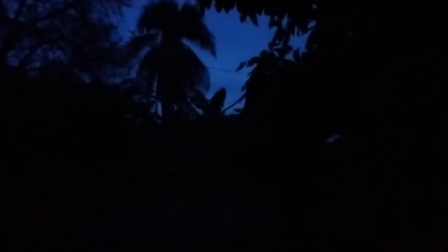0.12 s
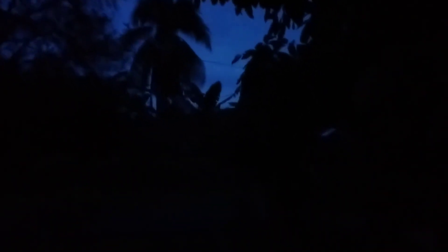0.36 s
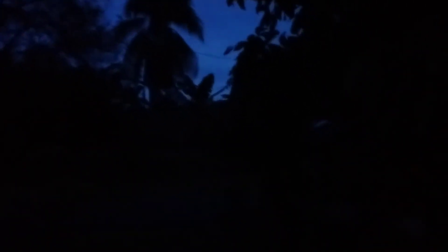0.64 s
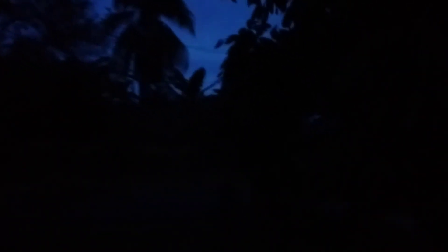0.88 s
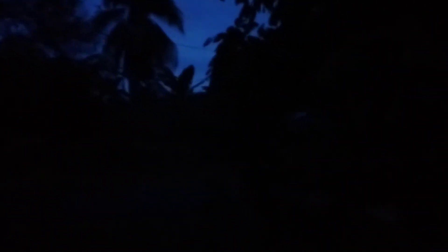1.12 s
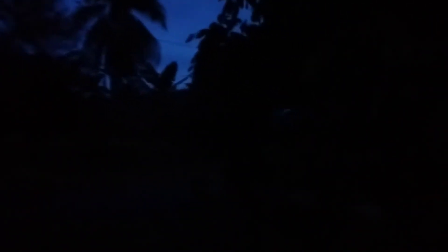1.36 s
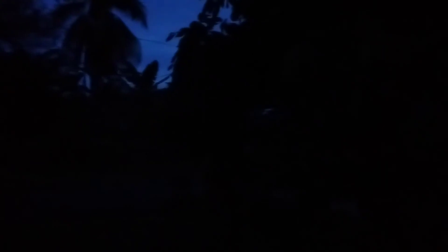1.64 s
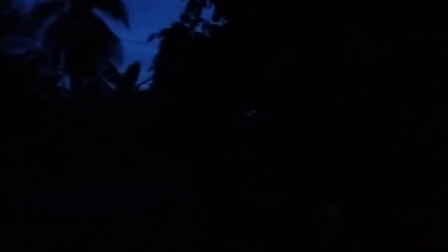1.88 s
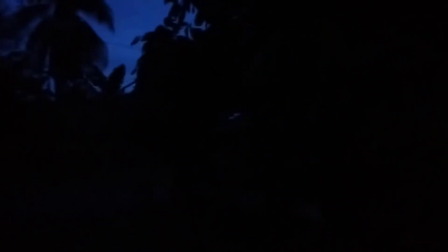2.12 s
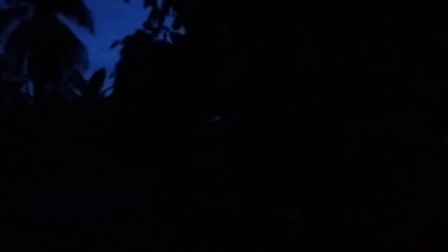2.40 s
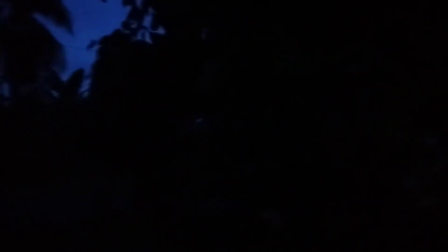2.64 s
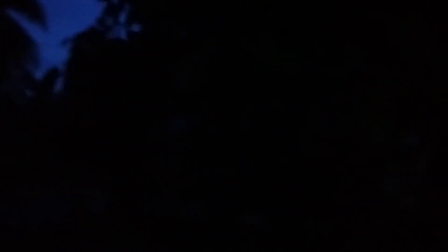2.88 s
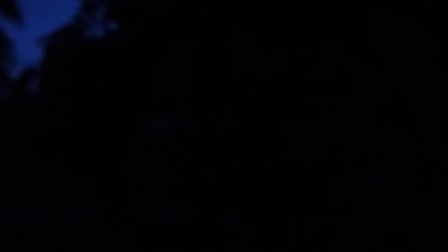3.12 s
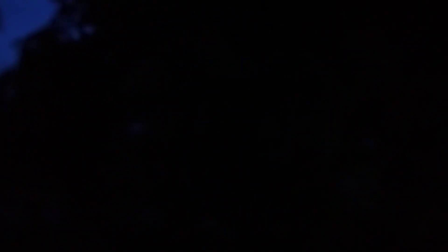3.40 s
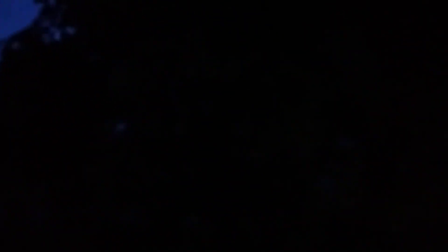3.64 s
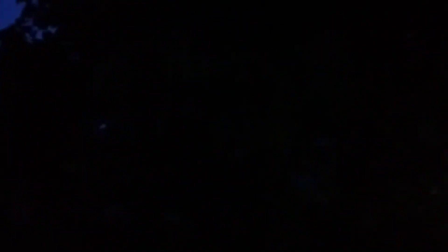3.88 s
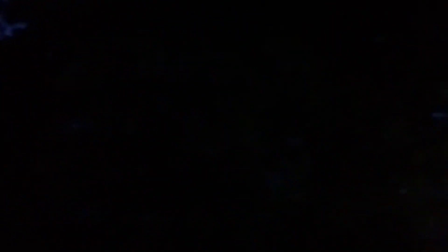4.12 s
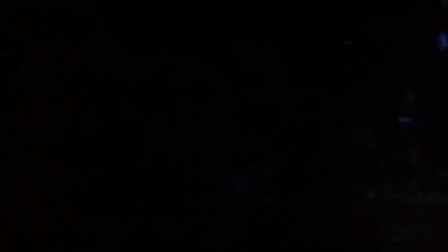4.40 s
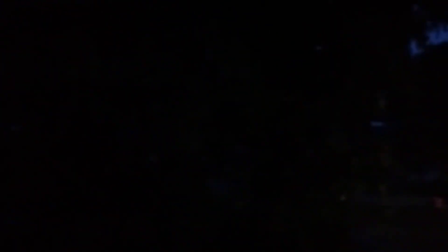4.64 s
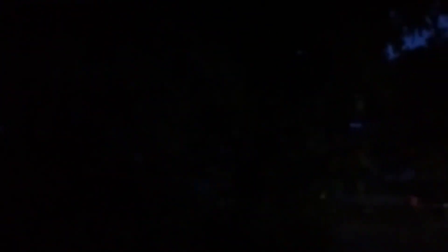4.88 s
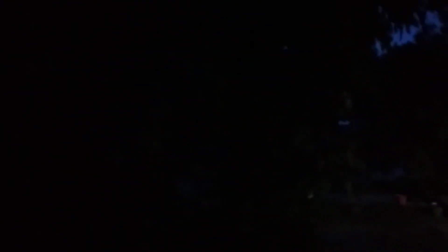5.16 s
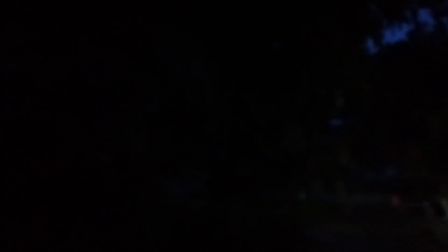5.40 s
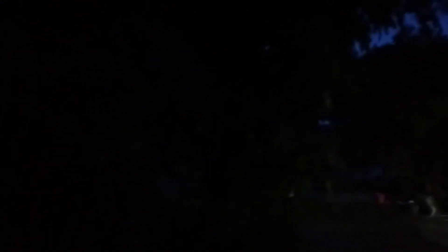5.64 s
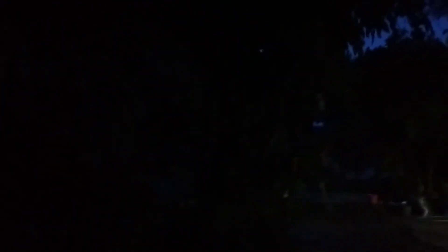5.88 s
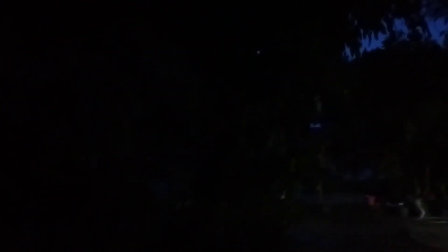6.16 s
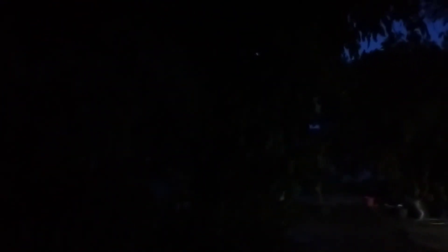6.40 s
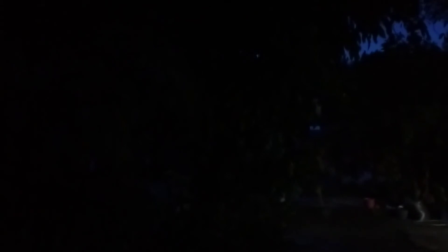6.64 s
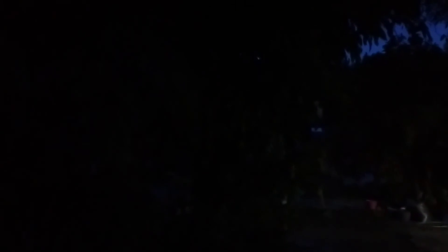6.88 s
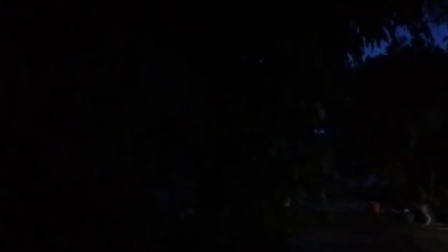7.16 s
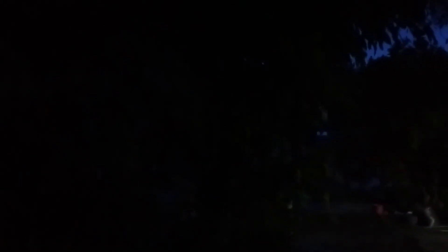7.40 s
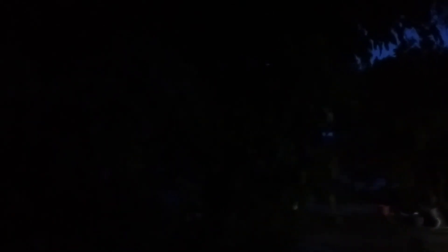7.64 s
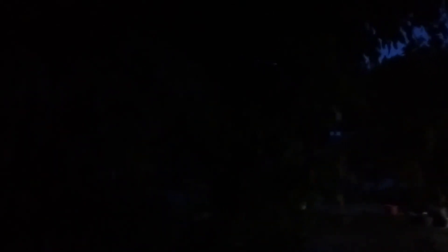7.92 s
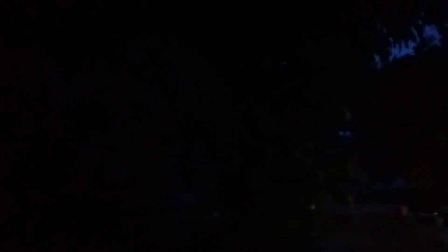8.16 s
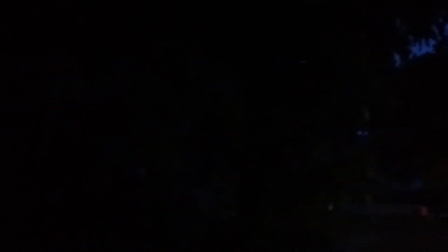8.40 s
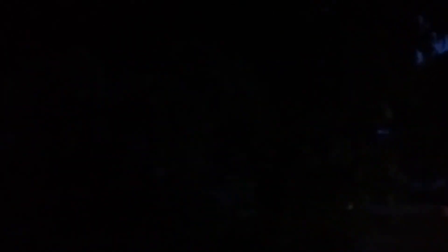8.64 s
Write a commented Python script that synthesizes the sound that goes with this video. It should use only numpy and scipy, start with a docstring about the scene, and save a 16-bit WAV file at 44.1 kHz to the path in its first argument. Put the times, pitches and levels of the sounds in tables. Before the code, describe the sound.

Outdoor dawn chorus among palms and dense foliage. Clear, rapid whistles swoop up and down, echoing off trunks, with short burry warbles and one nearer, drier bird. Soft hoarse low calls sit almost hidden. Behind them are continuous overlapping distant peeps, gradually swelling, steady insect buzzing and faint hum. The singing opens briskly, thins out, then returns richly until the end, with occasional gritty scuffs and two tiny ticks.

```python
"""From the first moment a distant motor hums in still dawn air, insects buzz high up and a far flock
peeps without pause; then songbirds whistle gliding notes that echo off trunks and walls.
Birds are gliding tones split into direct sound and echoes; the insects are throbbing bands of noise.
Soft hoarse calls lie low in the mix; gritty noise makes raspy scuffs, decaying sines make thin ticks."""
import sys
import numpy as np
from scipy import signal
from scipy.fft import rfft, irfft, next_fast_len
from scipy.io import wavfile
from scipy.ndimage import uniform_filter1d

SR = 44100
rng = np.random.default_rng(int(sys.argv[2]) if len(sys.argv) > 2 else 0)


def to_wav(sig):
    """Store sig (one row per channel, or 1-D mono) as 16-bit WAV at the path in sys.argv[1].

    Samples outside -1..1 are clipped; the rate is SR.
    """
    pcm = np.clip(np.atleast_2d(sig), -1, 1) * 32767
    pcm = np.round(pcm).astype(np.int16)
    wavfile.write(sys.argv[1], SR, pcm.T)  # frames by channels


def invert_db(x):
    """Field ratio 10**(x/20) for x, a level in decibels (scalar or array-like)."""
    u = np.asarray(x, float) / 20
    return 10 ** u


N = 387198

# still air and far traffic, relative spectrum: (f/Hz, level/dB per Hz)
AIR_SPECTRUM = [(50, -60), (62, -8), (140, -2), (320, -6), (500, -12), (1080, -12.5), (1300, -4),
                (2400, -18), (3100, -13), (3850, -20), (6500, -22.5), (11000, -25), (12200, -38),
                (15600, -24)]
# partials of the motor hum: (f/Hz, mean level/dB)
MOTOR_PARTIALS = [(92, -67), (190, -71)]
# insect bands: (centre f/Hz, half-width f/Hz, mean level/dB, mean wing strokes/per s, stroke depth/0-1)
INSECT_BANDS = [(5005, 350, -64.5, 440, 0.27), (7470, 200, -71, 130, 0.3), (9960, 664, -64.5, 150, 0.14)]
# loudest peeps of the far flock, before the flock's own trims: (t/s, mid f/Hz, level/dB, length t/s)
LOUD_PEEPS = [(0.434, 1795, -59, 0.067), (0.575, 1890, -54, 0.038), (0.928, 2060, -46.5, 0.025),
              (2.421, 1953, -56, 0.062), (2.51, 2230, -54.5, 0.12), (2.639, 1732, -56, 0.071),
              (2.768, 2300, -59, 0.049), (2.85, 1860, -55, 0.027), (2.951, 1686, -56, 0.041),
              (3.022, 1934, -51, 0.041), (3.147, 2060, -44.5, 0.031), (3.19, 2304, -49, 0.021),
              (3.234, 2037, -47, 0.052), (3.518, 1960, -53, 0.062), (3.591, 2114, -53, 0.082),
              (3.739, 1740, -55, 0.069), (3.937, 1965, -53.5, 0.034), (4.037, 1720, -49.5, 0.047),
              (4.283, 2060, -50, 0.075), (4.48, 2280, -51, 0.049), (4.507, 1595, -50.5, 0.017),
              (4.622, 2424, -47, 0.021), (4.922, 2075, -46.5, 0.11), (5.222, 1990, -44, 0.081),
              (5.376, 2264, -48.5, 0.077), (5.595, 1550, -54, 0.054), (5.804, 1846, -54, 0.076),
              (5.862, 1630, -52.5, 0.033), (6.235, 1953, -47.5, 0.043), (6.243, 1667, -54.5, 0.071),
              (6.368, 2316, -44, 0.15), (6.683, 1924, -50.5, 0.036), (6.956, 1883, -49.5, 0.074),
              (7.173, 1610, -49, 0.035), (7.539, 2410, -54, 0.081), (7.823, 1840, -53, 0.075),
              (8.076, 1628, -51.5, 0.026), (8.114, 2290, -47.5, 0.056), (8.201, 2223, -42.5, 0.022),
              (8.334, 1680, -51.5, 0.014), (8.748, 1820, -52, 0.025)]
# crowd of the far flock, reference level of a peep at each pitch: (f/Hz, level/dB)
CROWD_LEVELS = [(1200, -65), (1300, -64), (1600, -57.5), (2000, -51), (2400, -55), (2600, -68.5)]
# whistles across the garden, level at the source: (start t/s, length t/s, from f/Hz, to f/Hz, level/dB)
GARDEN_NOTES = [(.1, 0.058, 2664, 2930, -39.5), (.146, .058, 2910, 3080, -34.5),
                (.2, 0.039, 3100, 3380, -35), (.234, 0.023, 3345, 3375, -27.5),
                (.26, 0.012, 3506, 2860, -35), (.31, 0.062, 3820, 3750, -50),
                (.395, 0.02, 3900, 4115, -36.5), (.414, 0.025, 4060, 3320, -33.5),
                (.445, 0.043, 3300, 3270, -34), (.535, 0.056, 3328, 3303, -30),
                (.592, 0.021, 3367, 2970, -32.5), (.7, 0.064, 2610, 2900, -38),
                (.752, 0.029, 2915, 2970, -35), (.783, 0.037, 2950, 2835, -42.5),
                (.8, 0.043, 2480, 2210, -45.5), (.845, 0.062, 2440, 2600, -42.5),
                (.925, 0.04, 2480, 2060, -49), (.966, 0.014, 3240, 4370, -44),
                (.985, 0.026, 2850, 3460, -35), (1.012, 0.033, 3295, 3510, -29),
                (1.05, 0.09, 3590, 4360, -33.5), (1.13, 0.038, 4310, 4890, -37),
                (1.025, 0.086, 2815, 2496, -44.5), (1.29, 0.057, 4230, 2880, -36.5),
                (1.37, 0.089, 2483, 2565, -45.5), (1.445, 0.095, 2532, 2392, -38),
                (1.58, 0.14, 2400, 2365, -43), (1.805, 0.023, 2890, 2600, -43.5),
                (1.47, 0.036, 3080, 3054, -51.5), (1.74, 0.12, 2404, 2296, -43),
                (1.87, 0.09, 2290, 2186, -44), (1.9, 0.16, 2503, 2260, -43), (1.88, 0.045, 2690, 3050, -41),
                (1.92, 0.14, 2970, 3290, -40), (2.065, 0.056, 2990, 3013, -32.5),
                (2.128, 0.03, 3020, 3680, -32), (2.158, 0.05, 3710, 2804, -34),
                (2.19, 0.041, 2350, 2270, -44.5), (2.38, 0.016, 3410, 2760, -48),
                (2.425, 0.04, 2550, 2780, -47.5), (2.46, 0.048, 2876, 2850, -42.5),
                (2.93, 0.039, 3840, 3130, -60.5), (3.092, 0.021, 3000, 3420, -47),
                (3.115, 0.094, 3454, 3700, -47), (3.7, 0.12, 2430, 2396, -54),
                (3.2, 0.083, 3695, 3806, -45), (3.405, 0.016, 4000, 4010, -45.5),
                (3.418, 0.029, 3950, 2800, -43.5), (3.445, 0.02, 2740, 2630, -51),
                (3.465, .045, 2356, 2280, -54), (3.865, 0.035, 3270, 3330, -58),
                (3.897, 0.047, 3750, 2630, -53), (3.79, 0.051, 2433, 2323, -45),
                (3.97, .055, 2430, 2424, -52.5), (4.03, 0.032, 2394, 2330, -43),
                (4.07, 0.027, 2310, 2210, -58), (4.315, 0.039, 2310, 2230, -45),
                (4.115, 0.018, 2500, 3900, -49.5), (4.243, 0.021, 3820, 2630, -51.5),
                (4.245, 0.066, 2329, 2327, -40), (5.08, 0.3, 2990, 3420, -63.5),
                (5.645, 0.097, 3126, 2506, -41.5), (5.71, 0.11, 2590, 2530, -39.5),
                (5.8, 0.084, 2585, 2930, -43), (5.87, .12, 2550, 2300, -48),
                (6.075, 0.18, 2676, 3234, -39.5), (6.17, 0.11, 3225, 3415, -34.5),
                (6.132, 0.027, 3680, 4140, -42.5), (6.155, 0.088, 4160, 4330, -38),
                (6.22, 0.1, 4335, 4217, -38), (6.418, 0.018, 3380, 3620, -40),
                (6.438, 0.043, 3570, 2926, -30.5), (6.488, 0.028, 3000, 3506, -31),
                (6.515, 0.061, 3310, 3590, -33), (6.385, 0.053, 2570, 2720, -48),
                (6.425, 0.092, 2694, 2230, -37), (6.54, 0.032, 2250, 2280, -39),
                (6.59, 0.078, 2300, 2920, -36), (6.697, 0.021, 2814, 2960, -34),
                (6.73, 0.05, 2940, 3280, -30), (6.77, 0.067, 3310, 3177, -29.5),
                (6.845, 0.037, 3150, 2910, -35.5), (6.75, 0.056, 2770, 2390, -37),
                (6.87, 0.089, 2090, 2213, -43), (6.9, 0.026, 4450, 4780, -48),
                (6.918, 0.04, 4820, 3840, -39), (6.95, 0.036, 3900, 4050, -33),
                (7.0, 0.026, 4080, 3550, -38), (7.02, 0.027, 3490, 3300, -31.5),
                (6.945, 0.061, 5120, 5150, -36), (6.98, 0.049, 5220, 5950, -36),
                (7.01, 0.036, 6040, 6140, -35.5), (7.04, 0.039, 6000, 6540, -39.5),
                (7.0, 0.044, 2583, 2364, -38), (7.07, 0.11, 2666, 3220, -37),
                (7.15, 0.089, 3206, 3640, -30.5), (7.26, 0.1, 3590, 3266, -31.5),
                (7.142, 0.074, 4500, 5150, -40.5), (7.185, 0.12, 5104, 5214, -35),
                (7.2, 0.039, 2430, 2960, -40.5), (7.24, 0.19, 2900, 3330, -44),
                (7.388, 0.033, 5050, 4990, -34.5), (7.425, 0.05, 4940, 4030, -39),
                (7.465, 0.051, 3940, 2800, -31), (7.52, 0.059, 2760, 2140, -39),
                (7.55, 0.038, 2150, 2044, -42), (7.4, 0.044, 5690, 5700, -52),
                (7.468, 0.066, 3716, 3480, -36), (7.52, 0.058, 3500, 3640, -50),
                (7.598, 0.033, 3350, 3430, -37), (7.628, 0.031, 3540, 3520, -34.5),
                (7.646, 0.014, 3410, 2950, -37.5), (7.665, 0.021, 2078, 2013, -38.5),
                (7.695, 0.087, 2143, 2094, -44.5), (7.73, 0.062, 3400, 3300, -43),
                (7.77, 0.03, 3385, 2930, -30.5), (7.81, 0.032, 3046, 2960, -34),
                (7.785, 0.05, 2900, 2470, -42.5), (7.825, 0.06, 2440, 2300, -48),
                (7.885, 0.055, 2440, 2330, -36), (7.875, 0.087, 2590, 2720, -36.5),
                (7.94, 0.05, 2240, 2300, -53), (8.0, 0.09, 2320, 2480, -43.5),
                (7.76, 0.093, 4830, 5100, -51.5), (8.13, 0.095, 3003, 2484, -37),
                (8.188, 0.042, 2800, 2945, -36), (8.27, 0.11, 2717, 2700, -38.5),
                (8.36, .12, 2800, 2730, -47), (8.305, .03, 2035, 2370, -46), (8.33, 0.08, 2390, 2320, -44),
                (8.51, 0.048, 3230, 3640, -45), (8.55, 0.14, 3605, 3840, -47.5),
                (8.68, 0.076, 3760, 3720, -56), (8.527, 0.068, 3080, 2650, -37.5),
                (8.59, 0.033, 2560, 2060, -41.5), (8.48, 0.043, 2120, 2040, -45),
                (8.55, 0.064, 2320, 2390, -45), (8.705, 0.044, 2350, 2820, -40),
                (8.68, 0.058, 2125, 2136, -45)]
# whistles of the bird nearest the microphone: (start t/s, length t/s, from f/Hz, to f/Hz, level/dB)
NEAR_BIRD_NOTES = [(2.085, 0.15, 3830, 3950, -41), (2.215, 0.091, 4010, 4080, -44),
                   (3.16, 0.14, 3750, 4434, -43.5), (3.285, 0.03, 4400, 4960, -45.5),
                   (3.31, 0.031, 4890, 5870, -50.5), (3.33, 0.035, 5870, 5750, -48.5),
                   (5.13, 0.12, 4260, 4107, -36.5), (5.233, 0.017, 4240, 5520, -43.5),
                   (5.245, 0.039, 5400, 5520, -44.5), (5.275, 0.061, 5570, 6470, -44),
                   (5.333, 0.033, 6530, 6455, -42.5), (6.31, 0.075, 3970, 4090, -40),
                   (6.378, 0.034, 4040, 4310, -39), (6.403, 0.017, 4350, 5400, -37.5),
                   (6.42, 0.04, 5340, 6240, -41.5), (8.11, 0.045, 3015, 3050, -42),
                   (8.14, 0.069, 3030, 3560, -37), (8.21, 0.094, 3573, 3600, -37.5),
                   (8.29, 0.078, 3650, 3890, -40)]
# notes sung as a burry warble: (start t/s, length t/s, from f/Hz, to f/Hz, level/dB)
WARBLED_NOTES = [(2.567, 0.039, 3165, 3060, -43), (3.525, 0.032, 2980, 3230, -46.5),
                 (3.555, 0.043, 3210, 3040, -47), (5.82, 0.06, 3755, 4043, -39.5),
                 (5.875, 0.041, 3990, 3400, -34.5), (5.91, 0.093, 3280, 3505, -39.5),
                 (7.81, 0.076, 3045, 2970, -40), (7.9, 0.084, 2680, 2740, -43),
                 (7.99, 0.078, 2890, 2770, -42)]
# low soft calls: (start t/s, length t/s, from f/Hz, to f/Hz, level/dB)
SOFT_CALLS = [(0.283, .16, 664, 643, -64.5), (0.658, .12, 707, 627, -64.5), (.84, 0.23, 681, 688, -65.5),
              (1.09, 0.073, 729, 723, -57.5), (1.13, 0.34, 808, 839, -61.5), (1.778, 0.107, 791, 784, -62),
              (1.881, .14, 879, 857, -63.5), (2.02, .05, 860, 790, -61), (6.34, 0.085, 620, 683, -63),
              (7.78, .12, 600, 720, -65), (8.745, 0.032, 670, 800, -51)]
# octave against its note, by where the octave lands: (f/Hz, relative level/dB)
OCTAVE_STRENGTH = [(5000, -10), (6600, -31), (7600, -23), (8200, -7.5), (9000, -19), (10500, -12),
                   (13000, -23)]
# higher overtones against their note, by where they land: (f/Hz, relative level/dB)
OVERTONE_STRENGTH = [(9000, -48), (11500, -44), (12600, -35), (13600, -39), (15200, -26)]
# raspy scuffs, level before darkening: (t/s, level/dB, rise t/s, t60/s, tilt/dB per octave)
SCUFF_EVENTS = [(0.647, -43, 0.0031, 0.86, 2.5), (1.173, -37.5, 0.023, 0.93, 6),
                (1.537, -49, 0.0081, 0.8, 4.5), (1.651, -49, 0.14, 0.3, -2), (4.656, -36, 0.015, 0.47, 4.5),
                (4.699, -42, 0.15, 0.32, -3), (4.84, -46, 0.06, 0.3, -5)]
# shared spectrum of the scuffs before their tilt: (f/Hz, relative level/dB per Hz)
SCUFF_SPECTRUM = [(1200, -35), (2800, 3.5), (4000, 2), (5400, 2.5), (6700, -10), (8300, -3), (9500, -14.5),
                  (12300, -25), (14800, -18)]
# thin treble ticks: (t/s, reference level/dB)
TICK_EVENTS = [(5.015, -45), (5.912, -33)]

AIR_DB = -56.5
CROWD_PEEPS_PER_S = 110
EDGE_HZ = 15550  # top of the band
GARDEN_DISTANCE, NEAR_DISTANCE = 0.35, 0.019  # 0 at the microphone, 1 far off
FARTHER_PER_DB, LOUD_DB = 0.025, -36  # a fainter garden note comes from a farther bird
ATTACK_S, RELEASE_S = 0.012, 0.0048  # fades centred on a note's start and end
ARCH_DB, PEAK_AT = -3, 0.55  # ends of a note against its peak, and the peak's share of its length
EASE = 0.35  # 0 glides evenly, 1 lingers on the first and last pitch
WARBLES_PER_S, SWING_HZ = 90, 190  # mean rate of a warble and its pitch swing each way
# overtones against the table: third of the near bird, third of the others, fifth, even ones above the octave
NEAR_THIRD_DB, THIRD_DB, FIFTH_DB, EVEN_DB = 1, 9, 2, -8
HOARSE = 0.6  # share of a low call's power that is rasp
ECHO_DB, BOUGHS_T60_S = -0.63, 0.1
CLOSE_ECHO_DB = -2  # a bird at the microphone stirs this much less echo
DARKEN_DB_PER_S = 16  # extra loss of a scuff for each octave above 3 kHz


def evened(x):
    """Scales to an rms of 1."""
    return x / np.sqrt(np.mean(x ** 2) + 1e-20)


def read(points, hz):
    """Reads a spectrum on a log-frequency axis."""
    f, value = np.transpose(points)
    return np.interp(np.log(hz + 1), np.log(f + 1), value)


def add(mix, s, sound):
    """Mixes a sound in at second s."""
    part = mix[max(round(s * SR), 0):][:len(sound)]
    part += sound[:len(part)]


def drift(samples, length=N):
    """Slow random wander of rms 1: noise smoothed twice over a span of samples."""
    span = max(round(samples), 2)
    noise = rng.standard_normal(length)
    return evened(uniform_filter1d(uniform_filter1d(noise, span), span))


def colour(x, db_of_hz):
    """Filters x by a gain in dB for each frequency."""
    size = next_fast_len(len(x))
    gain = invert_db(db_of_hz(np.fft.rfftfreq(size, 1 / SR)))
    return irfft(rfft(x, size) * gain, size)[:len(x)]


def still_air():
    """Smooth broadband noise shaped to the spectrum of still air and far traffic."""
    noise = rng.standard_normal(N)
    return invert_db(AIR_DB) * evened(colour(noise, lambda hz: read(AIR_SPECTRUM, hz)))


def motor_hum():
    """Sine partials that share one wavering speed while each wanders in level."""
    turns = np.cumsum(1 + 0.012 * drift(4750)) / SR
    hum = np.zeros(N)
    for hz, db in MOTOR_PARTIALS:
        level = invert_db(db + 2.5 * drift(2600))
        hum += np.sqrt(2) * level * np.sin(2 * np.pi * hz * turns)
    return hum


def insects():
    """Each kind is a band of noise that throbs at its wing rate and swells slowly."""
    out = np.zeros(N)
    for centre_hz, width, db, rate, depth in INSECT_BANDS:
        noise = rng.standard_normal(N)
        band = evened(colour(noise, lambda hz: np.maximum(-4.3 * ((hz - centre_hz) / width) ** 2, -90)))
        wing_phase = 2 * np.pi * np.cumsum(rate * (1 + 0.0184 * drift(8000))) / SR
        strokes = 1 + depth * np.sin(wing_phase)
        out += invert_db(db + 0.8 * drift(12000)) * strokes * band
    return out


def peep(s, hz, db, length, glide, rate, start):
    """A short call that jumps in, bends and wobbles in pitch and throbs in quick pulses."""
    u = np.arange(0, 1, 1 / (SR * length))  # share of the peep gone by
    wobble = 0.031 * np.sin(2 * np.pi * (rate * length * u + 3 * start))
    pitch = hz * (1 + glide * (u - 0.4) + wobble)
    throb = 1 + 0.69 * np.sin(2 * np.pi * (rate * length * u + start))
    swell = np.sin(np.pi * u ** 0.6) ** 0.94
    tone = np.sin(2 * np.pi * np.cumsum(pitch) / SR)
    return s, np.sqrt(2) * invert_db(db) * swell * throb * tone


def flock():
    """The loud peeps sag at their set moments; the crowd behind them peeps at random."""
    out = np.zeros(N)
    chances = rng.random((len(LOUD_PEEPS), 3))
    for (s, hz, db, length), (bend, rate, start) in zip(LOUD_PEEPS, chances):
        add(out, *peep(s - 0.004, hz, db + 0.5, length + 0.024, -0.07 * bend, 75 + 45 * rate, start))
    low_hz, high_hz = CROWD_LEVELS[0][0], CROWD_LEVELS[-1][0]
    crowd = rng.random((round(CROWD_PEEPS_PER_S * N / SR), 7))
    for when, where, size, span, bend, rate, start in crowd:
        hz = low_hz * (high_hz / low_hz) ** where
        db = read(CROWD_LEVELS, hz) + 13 * (size - 1.1) + 4 * when  # the crowd swells as time goes on
        length = 0.025 + 0.04 * span
        add(out, *peep(when * N / SR, hz, db, length, 0.12 * (bend - 0.6), 60 + 55 * rate, start))
    return out


def trees(x, t60, late_db):
    """Quick dense echoes off near boughs plus a long tail; three sets of leaves take turns in the sway."""
    at = np.arange(100, SR - 20, 20)
    sway = 2 * np.pi * np.cumsum(11 + 5 * drift(2501)) / SR
    decay = invert_db(-60 * at / SR / BOUGHS_T60_S) + invert_db(late_db - 60 * at / SR / t60)
    out = np.zeros(N)
    for k in range(3):
        tail = np.zeros(SR)
        tail[at + rng.integers(0, 20, len(at))] = rng.choice([-1., 1.], len(at)) * decay
        turn_taking = np.cos(sway + k * 2 * np.pi / 3)
        out += signal.oaconvolve(x * turn_taking, tail / np.linalg.norm(tail))[:N]
    return out * np.sqrt(2 / 3)


def whistle(start, length, from_hz, to_hz, db, dull_db, third_db=THIRD_DB, burr=0):
    """A gliding near-sine: its level and phase flutter at random, effort lifts overtones above the octave."""
    t = np.arange(-ATTACK_S / 2, length + RELEASE_S / 2, 1 / SR)
    u = np.clip(t / length, 0, 1)  # share of the note gone by
    glide = u - EASE * np.sin(2 * np.pi * u) / (2 * np.pi)
    off_peak = np.where(u < PEAK_AT, 1 - u / PEAK_AT, (u - PEAK_AT) / (1 - PEAK_AT))
    level_db = db + ARCH_DB * off_peak ** 2
    flutter = 1 + 0.23 * (drift(350, len(t)) + 1j * drift(350, len(t)))
    warble_hz = WARBLES_PER_S * (1 + 0.329 * drift(300, len(t)))
    beat = burr * np.sin(2 * np.pi * np.cumsum(warble_hz) / SR)
    pitch = from_hz + (to_hz - from_hz) * glide
    pitch = pitch * (1 + 0.0056 * drift(88, len(t))) + SWING_HZ * beat
    turn = np.exp(2j * np.pi * np.cumsum(pitch) / SR)
    tone = turn.copy()
    for k in range(2, 7):
        if k == 2:
            strength_db = read(OCTAVE_STRENGTH, k * pitch) + dull_db
        else:
            effort_db = 0.6 * (level_db - LOUD_DB)
            trim_db = {3: third_db, 5: FIFTH_DB}.get(k, EVEN_DB)
            strength_db = read(OVERTONE_STRENGTH, k * pitch) + effort_db + trim_db
        tone += invert_db(strength_db) * (k * pitch < EDGE_HZ) * turn ** k
    ends = np.clip(np.minimum((t - t[0]) / ATTACK_S, (t[-1] - t) / RELEASE_S), 0, 1)
    voice = (flutter * (1 + 0.13 * beat) * tone).real
    return start + t[0], np.sqrt(2) * invert_db(level_db) * ends * voice


def songbirds():
    """Splits notes into direct sound and echo feed; distance takes away direct sound and dulls the octave."""
    direct, echoed = np.zeros((2, N))
    groups = [(GARDEN_NOTES, GARDEN_DISTANCE, THIRD_DB, 0),
              (NEAR_BIRD_NOTES, NEAR_DISTANCE, NEAR_THIRD_DB, 0),
              (WARBLED_NOTES, GARDEN_DISTANCE, THIRD_DB, 1)]
    for rows, perch, third_db, burr in groups:
        for row in rows:
            farther = FARTHER_PER_DB * (LOUD_DB - row[-1]) * (perch > NEAR_DISTANCE)
            distance = np.clip(perch + farther, 0, 1)
            s, note = whistle(*row, dull_db=-42 * distance, third_db=third_db, burr=burr)
            add(direct, s, invert_db(-13 * distance ** 2) * note)
            add(echoed, s, invert_db(CLOSE_ECHO_DB * (1 - distance)) * note)
    return direct, echoed


def low_calls():
    """Soft low whistles without a strong octave, roughened by random level changes."""
    out = np.zeros(N)
    for row in SOFT_CALLS:
        s, call = whistle(*row, dull_db=-90)
        rasp = np.sqrt(1 - HOARSE) + np.sqrt(HOARSE) * drift(250, len(call))
        add(out, s, call * rasp)
    return out


def scuffs():
    """Patchy, gritty noise that rises, dies away and loses its treble first."""
    out, t = np.zeros(N), np.arange(SR) / SR
    for s, db, rise, t60, tilt in SCUFF_EVENTS:
        grains = rng.standard_normal(SR) * invert_db(0.54 * drift(40, SR))
        hz, age, z = signal.stft(grains, SR, nperseg=128)
        # patches of time and frequency stand out by chance
        patches = evened(uniform_filter1d(uniform_filter1d(rng.standard_normal(z.shape), 3, 0), 9, 1))
        tilt_db = tilt * np.log2(np.maximum(hz, 1500) / 5000)
        z = z * invert_db((read(SCUFF_SPECTRUM, hz) + tilt_db)[:, None] + 2.1 * patches)
        level = np.sqrt(np.mean(signal.istft(z, SR, nperseg=128)[1] ** 2))
        octaves_up = np.log2(np.maximum(hz / 3000, 1))
        dark = invert_db(-DARKEN_DB_PER_S * octaves_up[:, None] * age)
        grit = signal.istft(z * dark, SR, nperseg=128)[1][:SR] / level
        fade = invert_db(db - 60 * np.maximum(t - rise, 0) / t60)
        add(out, s, fade * np.minimum(t / rise, 1) * grit)
    return out


def ticks():
    """Single bright clicks: two treble sines that die within about a millisecond."""
    out, t = np.zeros(N), np.arange(90) / SR
    ring = np.sin(2 * np.pi * 14500 * t) + 0.4 * np.sin(2 * np.pi * 8000 * t)
    for s, db in TICK_EVENTS:
        add(out, s, invert_db(db) * ring * np.exp(-t / 0.00018))
    return out


def scene():
    """Mixes the beds, the flock, the birds with their echoes, the scuffs and the ticks."""
    bed = still_air() + motor_hum() + insects()
    peeps = flock()
    far_flock = invert_db(2.5) * peeps + invert_db(-3.5) * trees(peeps, 0.97, late_db=-2)
    direct, echoed = songbirds()
    echoed += low_calls()  # these come by echo alone
    # leaves scatter the high treble off the direct path
    birds = colour(direct, lambda hz: -0.4 - 8 * (hz > 9500))
    birds += invert_db(ECHO_DB) * trees(echoed, 0.45, late_db=-1.5)
    return (bed + far_flock + birds + scuffs() + ticks())[None]


def top_cut(x):
    """Nothing passes above the cut-off."""
    return signal.sosfilt(signal.butter(12, 15710, fs=SR, output="sos"), x)


def record(dry):
    """The recorder's band limit: a steep low-pass takes away what lies above the edge."""
    edge = signal.firwin(511, EDGE_HZ, window=("kaiser", 9), fs=SR)
    mix = signal.oaconvolve(dry, edge[None], "same")
    return top_cut(mix)


dry = scene()
out = record(dry)
to_wav(out)
```